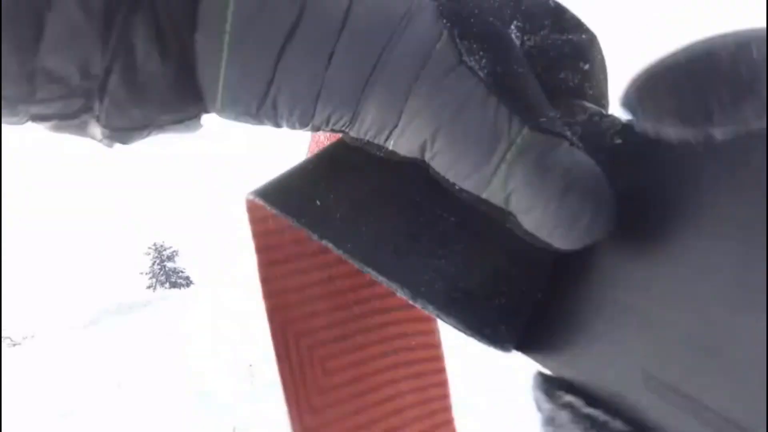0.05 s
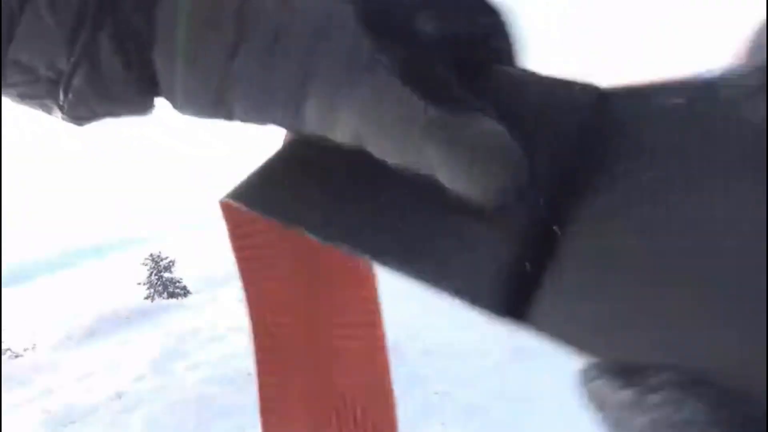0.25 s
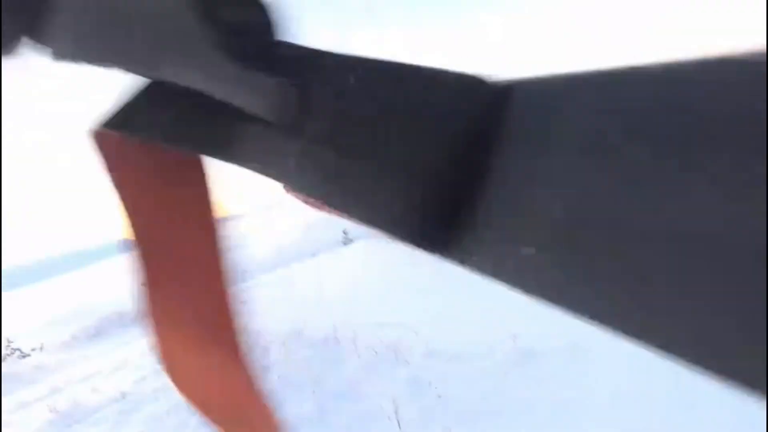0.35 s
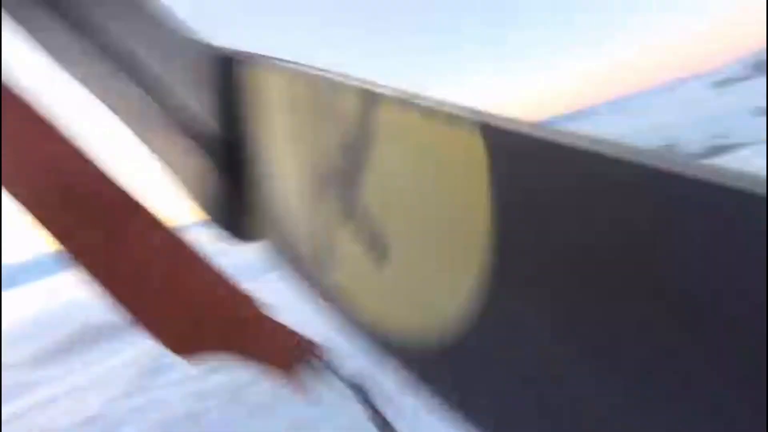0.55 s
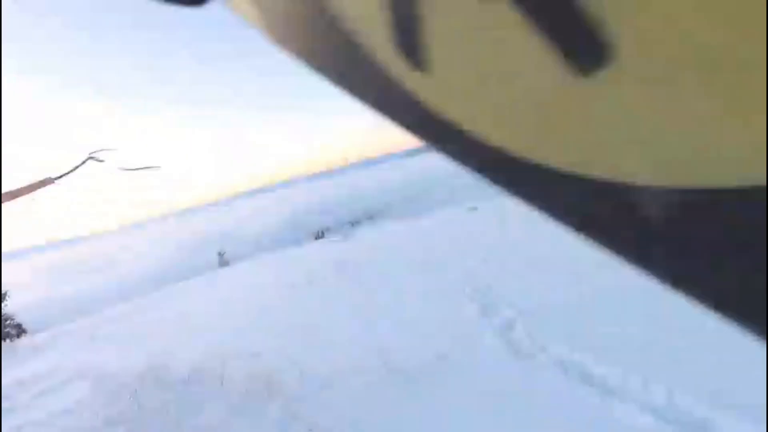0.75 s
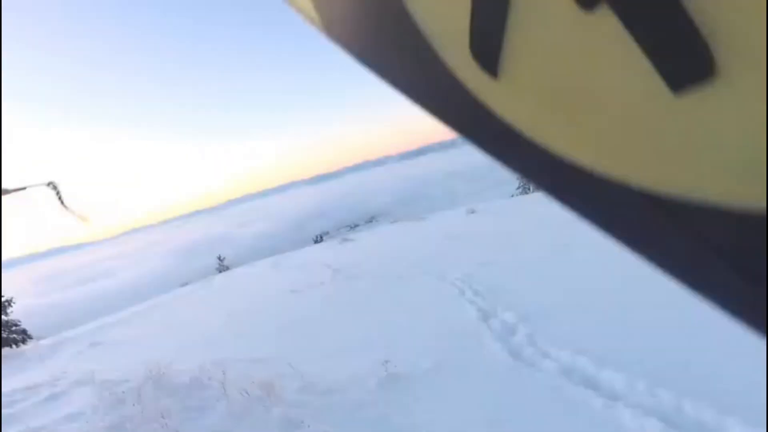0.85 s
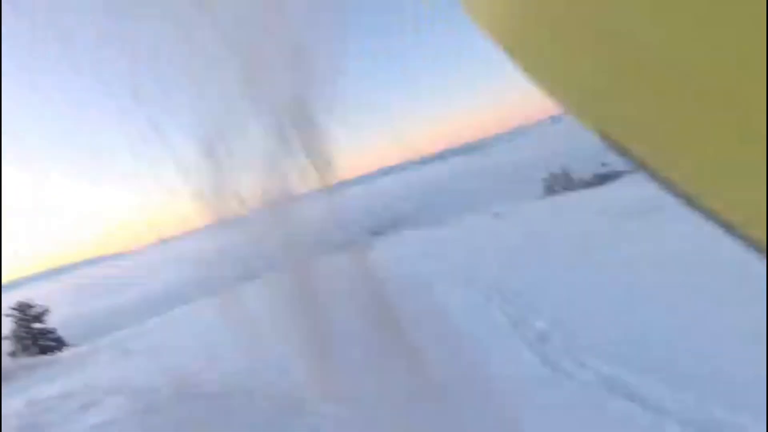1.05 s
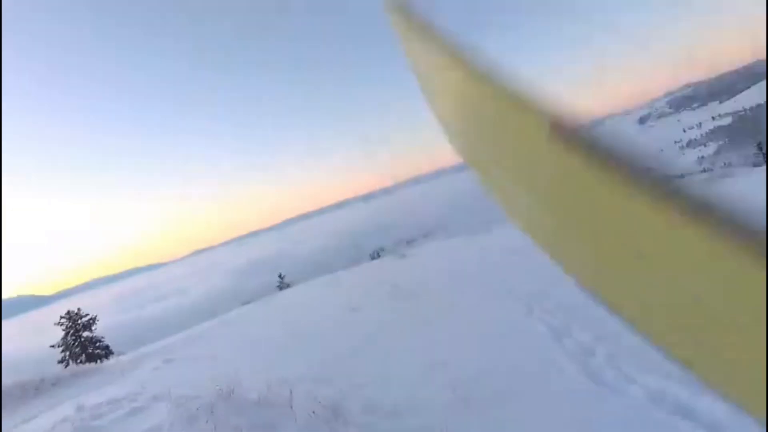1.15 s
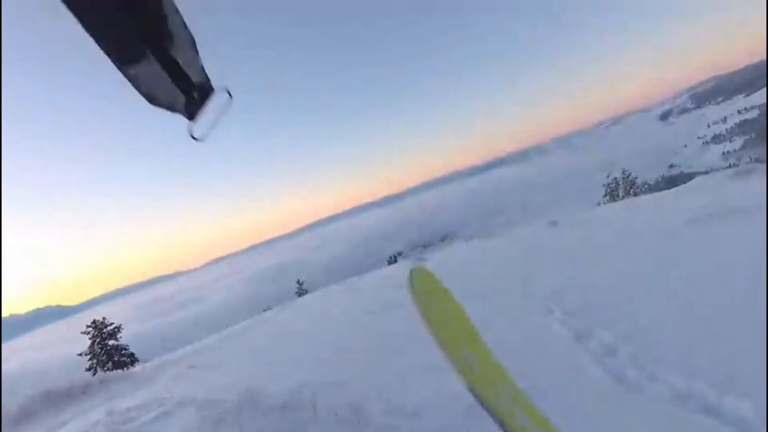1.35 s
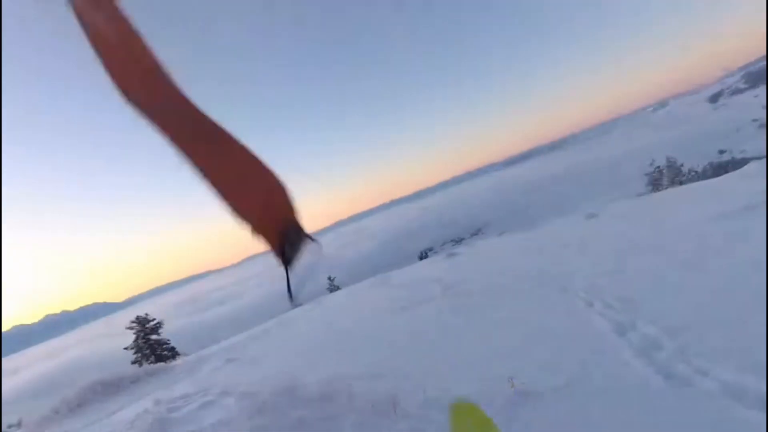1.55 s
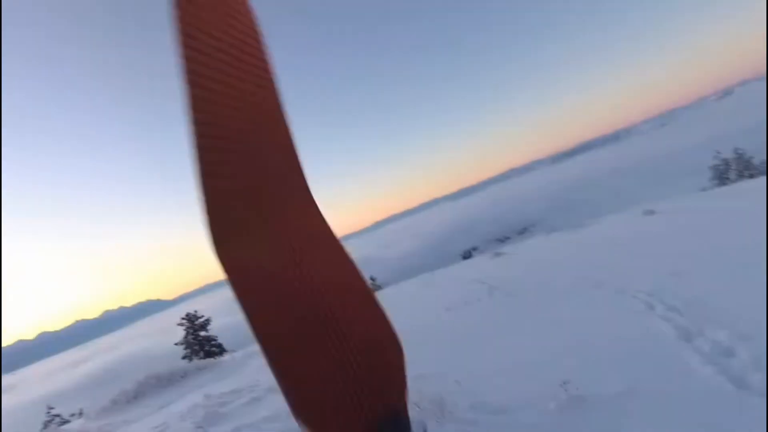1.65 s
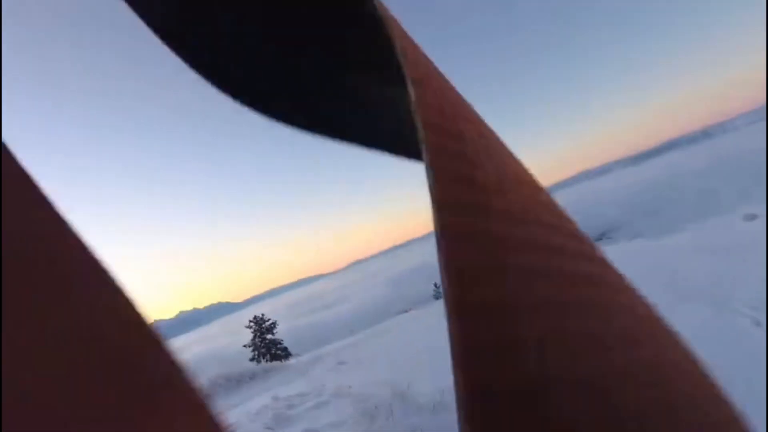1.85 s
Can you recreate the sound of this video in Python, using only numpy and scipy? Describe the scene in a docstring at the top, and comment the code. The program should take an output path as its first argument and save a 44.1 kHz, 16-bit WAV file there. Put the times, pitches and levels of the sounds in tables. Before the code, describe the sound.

A climbing skin rips off a ski, followed by hard, close knocks and another rip.

```python
"""After a faint low thump, stretched glue sizzles and a climbing skin rips off a ski, on quiet snow.
The glue lets go in quick slips that ring the ski, over a fizz of snapping threads. The ski knocks
hard beside the microphone and overloads it. A second short rip frees the tip, clothing rustles,
and the loose skin swings with one small clack."""
import sys
import numpy as np
from scipy import signal
from scipy.fft import rfft, irfft
from scipy.io import wavfile
from scipy.ndimage import uniform_filter1d

SR = 44100
rng = np.random.default_rng(int(sys.argv[2]) if len(sys.argv) > 2 else 0)


def dump(signal):
    """Clip the signal to [-1, 1] and save it as 16-bit WAV at the path in sys.argv[1]."""
    limited = np.clip(np.atleast_2d(signal).T, -1, 1)
    pcm = np.round(limited * 32767).astype(np.int16)
    wavfile.write(sys.argv[1], SR, pcm)


N = 83790
FFT_SIZE = 2 ** 17
TIME = np.arange(N) / SR
HZ = np.arange(FFT_SIZE // 2 + 1) * SR / FFT_SIZE

# one list for each pull on the skin: (time [s], ring level [dB], rasp level [dB], fizz level [dB])
PULLS = [
    [(0.248, -15, -24, -25), (0.292, -14, -17.5, -20.5), (0.313, -9.5, -17.5, -18),
     (0.342, -18, -18.5, -15), (0.354, -9.5, -17, -15.5), (0.395, -16, -12, -14), (0.42, -17, -18, -20),
     (0.52, -24.5, -14.5, -13.5), (0.547, -18, -16, -15), (0.556, -33.5, -31.5, -31),
     (0.612, -35.5, -36.5, -35.5)],
    [(0.851, -29.5, -28, -17), (0.862, -19.5, -15.5, -11), (0.88, -20.5, -22.5, -4.5),
     (0.889, -33.5, -21, -20), (0.906, -33, -25.5, -34), (0.94, -40, -23.5, -37),
     (0.975, -41.5, -49.5, -57)],
]
# how fast the glue peels: (time [s], slip rate [1/s])
SLIP_RATE = [(0.29, 227), (0.37, 380), (0.93, 300)]
# the ski's main ring, shifting as the glue line travels: (time [s], pitch [Hz], boost [dB])
MOVING_RING = [(0.28, 1080, 0.5), (0.315, 1335, 4.5), (0.39, 1163, 10), (0.43, 1160, 3.5),
               (0.465, 1236, 12.5), (0.525, 1190, 12.5), (0.54, 1105, 2), (0.87, 1272, 12.5)]
# steady resonances, the pitches a thing favours: (pitch [Hz], width [Hz], boost [dB])
SKI_RINGS = [(1521, 35, 7.5), (2281, 290, 11)]
SLEEVE_RINGS = [(793, 45, 10.1), (1216, 55, 12)]
# glue stretching before each pull: (time [s], level [dB], length [s])
STRETCHES = [(0.101, -34.5, 0.29), (0.649, -48, 0.13)]
# hard knocks of the ski:
# (time [s], level [dB], length [s], thud against crack [dB], treble limit [Hz], hollow note [Hz])
KNOCKS = [(0.6166, 1, 0.0073, -9, 14100, 413), (0.6238, -7, 0.0045, 2.5, 7980, 399.6),
          (0.637, -9.5, 0.0067, 0.5, 12200, 218.2), (0.644, -24, 0.014, -20, 8770, 1098),
          (0.659, -8, 0.004, -1, 9000, 1030), (0.664, -11.5, 0.0052, -5, 14000, 852),
          (0.69, -12, 0.0032, -8.5, 3220, 420)]
# short events: (time [s], level [dB])
GLUE_SNAPS = [(0.239, -14), (0.2478, -20), (0.451, -18), (0.5663, -14.5), (0.5826, -11.5), (0.597, -27.5),
              (0.918, -21)]
SKIN_CLACKS = [(1.592, -21.5)]
GRIT_TICKS = [(0.7621, -15.5), (1.396, -33)]
SOFT_BUMPS = [(0.94, -30.5), (0.976, -31.5), (1.038, -33), (1.056, -34.5), (1.077, -34.5), (1.122, -45),
              (1.188, -44), (1.329, -47.5), (1.347, -44.5), (1.883, -41)]
# a faint low thump at the very start, then two puffs of air on the microphone: (time [s], level [dB])
LOW_THUMPS = [(0.004, -49.5), (1.033, -45), (1.887, -34)]
# how loudly the clothing rubs: (time [s], level [dB])
RUSTLE_LEVELS = [(0.13, -48), (0.22, -42.5), (0.7, -33.5), (0.83, -55), (0.98, -37.5), (1.11, -48),
                 (1.18, -53.5), (1.39, -65.5), (1.42, -51.5), (1.54, -51.5), (1.62, -60)]
# each sound's tone, its balance of bass and treble: (frequency [Hz], relative level [dB])
RING_TONE = [(50, -31.5), (720, -17.5), (1050, -2.5), (1550, -4.5), (2100, -13), (5000, -37)]
RASP_TONE = [(1200, -33.5), (2300, -8), (3300, 1.5), (4700, -4), (8000, -28.5)]
FIZZ_TONE = [(2000, -22), (5400, 0), (6800, -2.5), (10800, 0.5), (13800, 3.5)]
CRACK_TONE = [(60, -21.5), (1300, -0.5), (3300, -5.5), (5500, -15)]
THUD_TONE = [(25, -15), (170, 0), (1300, -3.5), (5000, -65.5)]
CLACK_TONE = [(300, -29.5), (600, -4), (1000, -4), (1380, 8), (1850, -9.5), (3400, -5), (5000, -19.5),
              (15000, -36)]
TICK_TONE = [(200, -15.5), (2000, -3.5), (15000, -4.5)]
RUSTLE_TONE = [(100, -9.5), (350, -7.5), (750, -2), (1000, -6.5), (15000, -25.5)]
BUMP_TONE = [(100, -5), (550, 5), (15000, -27.5)]
THUMP_TONE = [(20, -24.5), (105, 3.5), (170, -21.5), (1000, -57.5)]
HISS_TONE = [(1500, 4.5), (4000, -2), (11000, -1.5), (14500, 4.5)]
# how alike left and right are: (frequency [Hz], likeness [0 to 1])
STEREO_LIKENESS = [(50, 0.56), (200, 0.91), (1300, 0.98), (4000, 0.05)]


def peel():
    """Glue sticks and slips, ringing the ski and rasping, while its thin threads snap in a fizz."""
    slip_spread_db, slip_decay_s = 4, .0016
    threads_per_s, thread_spread_db = 11000, 3.5
    speed = np.interp(TIME, *np.transpose(SLIP_RATE))
    uneven_rate = speed * np.exp(.24 * drift(250))
    slips = np.diff(np.floor(np.cumsum(uneven_rate) / SR), prepend=0)  # one click for each slip
    slips *= from_db(slip_spread_db * np.clip(rng.standard_normal(N), -2, 2))
    drag = .2 * (speed / 320) ** 2  # fast slips merge into a steady drag
    tearing = drag + signal.lfilter([1], [1, -np.exp(-1 / (slip_decay_s * SR))], slips)
    cracks = .8 * slips
    # dividing by the running strength lets PULLS set the loudness
    strength = np.sqrt(uniform_filter1d(tearing ** 2 + cracks ** 2, size=700))
    ring = shape_tone(pull_gain(1) * (tearing * noise() + cracks) / strength, RING_TONE, SKI_RINGS)
    rasp = shape_tone(pull_gain(2) * (tearing * noise() + cracks) / strength, RASP_TONE, SKI_RINGS)
    breaks = rng.random((2, N)) < threads_per_s / SR
    threads = breaks * from_db(thread_spread_db * rng.standard_normal(N)) * noise()
    fizz = unit_power(threads * (tearing / strength) ** .46)  # partly follows the slips
    return ring + rasp + shape_tone(pull_gain(3) * fizz, FIZZ_TONE)


def pull_gain(column):
    """Loudness over time from one column of PULLS, silent outside the pulls."""
    return sum(from_db(np.interp(TIME, pull[:, 0], pull[:, column], left=-np.inf, right=-np.inf))
               for pull in map(np.array, PULLS))


def glue_snaps():
    """Larger patches of glue let go at once, with the same ring, rasp and fizz."""
    force = sum(burst(start, db, hold_s=.00054, decay_s=.0019) for start, db in GLUE_SNAPS)
    rasp = from_db(4) * shape_tone(force * noise(), RASP_TONE, SKI_RINGS)
    ring = shape_tone(force * noise(), RING_TONE, SKI_RINGS)
    fizz = from_db(-1) * shape_tone(force * noise(), FIZZ_TONE)
    return ring + rasp + fizz


def ski_ring(sound):
    """The ski's main resonance moves as the glue line travels along it."""
    times, hz, boost_db = np.transpose(MOVING_RING)
    return resonate(sound, np.interp(TIME, times, hz), np.interp(TIME, times, boost_db), width_hz=90)


def ski_knocks():
    """The ski knocks close by: a harsh crack over a thud, with a hollow note set by the spot struck."""
    decay_s, apart = .0008, .2  # apart: the share that shakes left and right separately
    grit, shake = (np.sqrt(1 - apart) * noise() + np.sqrt(apart) * rng.standard_normal((2, N))
                   for _ in range(2))
    crack = thud = 0
    for start, db, length, thud_db, treble_hz, _ in KNOCKS:
        dull = signal.butter(3, treble_hz, fs=SR, output="sos")  # softer contacts are duller
        crack += signal.sosfilt(dull, burst(start, db, length, decay_s) * grit)
        thud += burst(start, db + thud_db, length, decay_s)
    hits = shape_tone(crack, CRACK_TONE) + shape_tone(thud * shake, THUD_TONE)
    starts, *_, hollow_hz = np.transpose(KNOCKS)
    latest_knock = np.searchsorted(starts[1:], TIME)
    return resonate(hits, hollow_hz[latest_knock], boost_db=6.5, width_hz=114)


def clack_and_ticks():
    """The loose skin and its clip clack once; glue and grit tick lightly."""
    clack = sum(burst(start, db, hold_s=0, decay_s=.0066, rise_s=.00094) for start, db in SKIN_CLACKS)
    ticks = sum(burst(start, db, hold_s=0, decay_s=.0017) for start, db in GRIT_TICKS)
    return shape_tone(clack * noise(), CLACK_TONE) + shape_tone(ticks * noise(), TICK_TONE)


def glue_sizzle():
    """Stretched glue starts a faint, uneven sizzle just before each pull."""
    tension = sum(burst(start, db, length, decay_s=.18, rise_s=.18) for start, db, length in STRETCHES)
    flicker = from_db(3.5 * drift(440))
    return shape_tone(tension * flicker * noise(), TICK_TONE)


def handling():
    """Clothing rustles, and the loose skin and sleeve flap."""
    rub = from_db(np.interp(TIME, *np.transpose(RUSTLE_LEVELS)) + 3 * drift(49.65))
    bumps = sum(burst(start, db, hold_s=.0021, decay_s=.008, rise_s=.00089) for start, db in SOFT_BUMPS)
    return (shape_tone(rub * noise(), RUSTLE_TONE, SLEEVE_RINGS)
            + shape_tone(bumps * noise(), BUMP_TONE, SLEEVE_RINGS))


def low_thumps():
    """A faint low thump at the very start; later, air puffs twice on the microphone."""
    thumps = sum(burst(start, db, hold_s=.022, decay_s=.0034, rise_s=.0034) for start, db in LOW_THUMPS)
    return shape_tone(thumps * noise(), THUMP_TONE)


def scatter(sound):
    """Sound bounces off ski, glove and housing, rippling the treble differently left and right."""
    gain, decay_s = from_db(-2), .002
    spray = unit_power(rng.standard_normal((2, N)) * np.exp(-TIME / decay_s)) / np.sqrt(N)
    spray = signal.sosfilt(signal.butter(2, 1500, "high", fs=SR, output="sos"), spray + 1e-18)
    bounces = signal.fftconvolve(sound, spray, axes=1)[:, :N]
    return (sound + gain * bounces) / np.sqrt(1 + gain ** 2)


def microphone_hiss():
    """The microphone adds its own faint, steady hiss."""
    return from_db(-53) * shape_tone(noise(), HISS_TONE)


def from_db(db):
    """Turn decibels into a multiplier."""
    return 10 ** (np.asarray(db) / 20)


def unit_power(x):
    """Scale to an average power of 1."""
    return x / np.sqrt(np.mean(x ** 2) + 1e-20)


def over_hz(points):
    """Join (frequency, value) points into a curve, spaced by octaves."""
    hz, value = np.transpose(points)
    return np.interp(np.log(HZ + 1), np.log(hz), value)


def shape_tone(sound, tone, rings=()):
    """Give a sound a tone and resonances; white noise keeps its power."""
    gain = from_db(over_hz(tone))
    for hz, width, boost_db in rings:
        peak = 1 / (1 + (2 * (HZ - hz) / width) ** 2)
        gain *= np.sqrt(1 + (from_db(boost_db) ** 2 - 1) * peak)
    # a minimum-phase filter: ringing comes after a hit, never before
    cepstrum = irfft(np.log(unit_power(gain)))[:FFT_SIZE // 2]
    cepstrum[1:] *= 2
    response = np.exp(rfft(cepstrum, FFT_SIZE))
    return irfft(rfft(sound, FFT_SIZE) * response)[..., :N]


def resonate(sound, hz, boost_db, width_hz):
    """Boost a narrow band around a pitch that can move."""
    turn = np.exp(2j * np.pi * np.cumsum(hz) / SR)
    fade = np.exp(-np.pi * width_hz / SR)
    # shift the pitch down to zero, smooth, then shift back
    ringing = 2 * np.real(turn * signal.lfilter([1 - fade], [1, -fade], sound / turn + 1e-18))
    return sound + (from_db(boost_db) - 1) * ringing


def noise():
    """White stereo noise, alike on both sides in the lows and unrelated in the treble."""
    alike = over_hz(STEREO_LIKENESS)
    mid, side = rfft(rng.standard_normal((2, FFT_SIZE)))
    spectrum = np.sqrt(1 + alike) * mid + np.sqrt(1 - alike) * side * [[1], [-1]]
    return unit_power(irfft(spectrum)[:, :N])


def drift(steps_per_s):
    """A random wobble with a typical size of 1."""
    return unit_power(np.interp(TIME * steps_per_s, np.arange(N), rng.standard_normal(N)))


def burst(start, db, hold_s, decay_s, rise_s=.00054):
    """Loudness of one event: it rises, then dies away from hold_s after its start."""
    age = TIME - start
    return from_db(db) * np.clip(age / rise_s, 0, 1) * np.exp(-np.clip((age - hold_s) / decay_s, 0, 20))


def scene():
    """Everything is close and dry; open snow gives no echo."""
    skin = glue_sizzle() + ski_ring(peel() + glue_snaps()) + clack_and_ticks()
    return scatter(skin) + ski_knocks() + handling() + low_thumps() + microphone_hiss()


def record(dry):
    """The microphone overloads on the knocks, and the highest treble is cut."""
    treble_cut = signal.ellip(10, .1, 70, 15500, fs=SR, output="sos")
    return signal.sosfilt(treble_cut, np.clip(dry, -1, 1))


dry = scene()
out = record(dry)
dump(out)
```